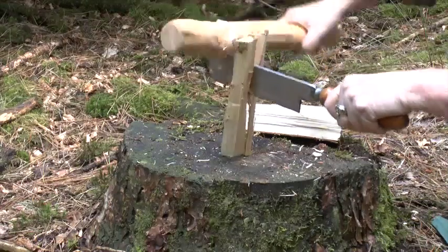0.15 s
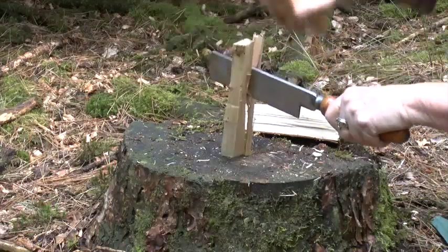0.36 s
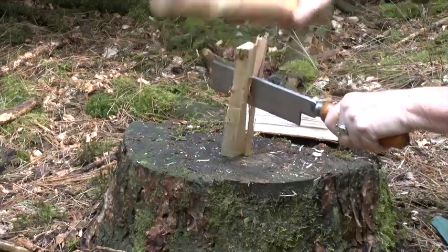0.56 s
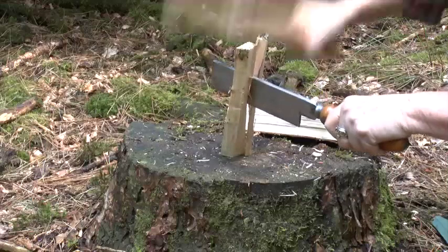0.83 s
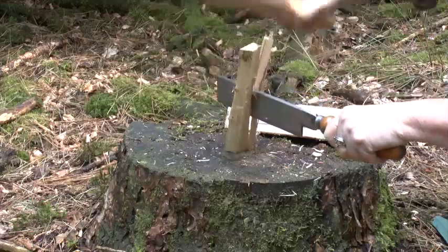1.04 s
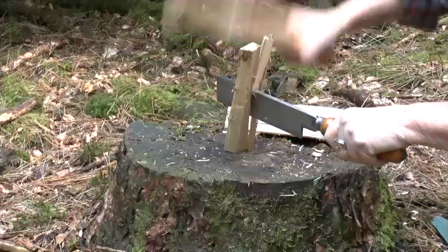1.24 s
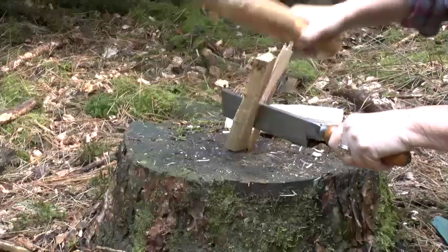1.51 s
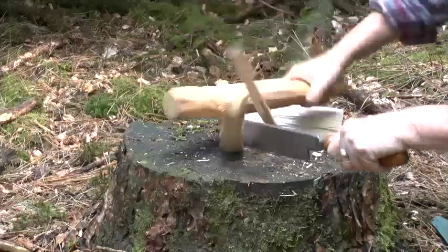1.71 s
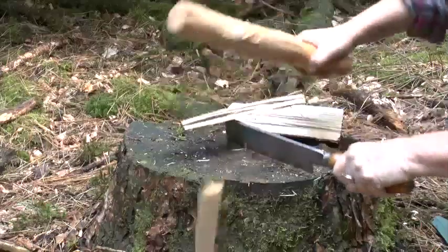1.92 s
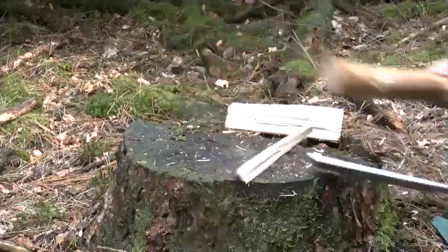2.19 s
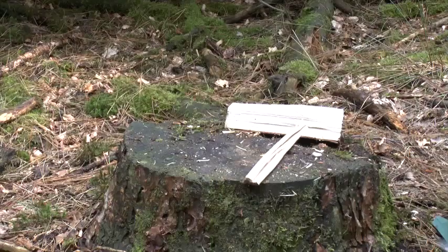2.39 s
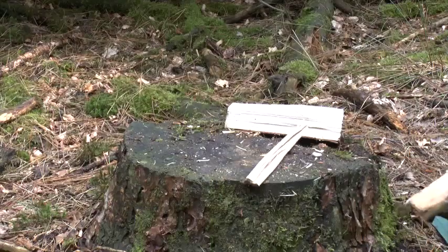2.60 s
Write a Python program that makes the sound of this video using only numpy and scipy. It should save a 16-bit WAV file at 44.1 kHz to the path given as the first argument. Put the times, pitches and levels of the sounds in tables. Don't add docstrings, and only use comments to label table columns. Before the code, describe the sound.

Wooden mallet striking a steel blade through a stick on a stump, five sharp knocks outdoors

```python
import sys
import numpy as np
from scipy import signal
from scipy.fft import rfft, irfft
from scipy.io import wavfile
from scipy.ndimage import uniform_filter1d

SR = 44100
rng = np.random.default_rng(int(sys.argv[2]) if len(sys.argv) > 2 else 0)


def gain_from_db(level_db):
    decades = np.asarray(level_db, float) / 20
    return 10 ** decades


def wav_record(signal):
    frames = np.transpose(np.atleast_2d(signal))
    bounded = np.clip(frames, -1, 1)
    quanta = np.round(bounded * 32767).astype(np.int16)
    wavfile.write(sys.argv[1], SR, quanta)


N = 121275

# (time [s], crack level [dB], stick boom level [dB], stump thud level [dB], contact [s])
BLOWS = [
    (0.206, -1, -6.5, -35, 0.003),
    (0.4956, 2, -7.5, -25.5, 0.0036),
    (0.9418, 1, -17.5, -18, 0.0013),
    (1.3468, -0.5, -15, -16.5, 0.0019),
    (1.7514, -0.5, -14.5, -17, 0.0034),
]
# (mallet level [dB], blade level [dB], blade pitch [ratio], tear level [dB], tear t60 [s])
SPLITS = [(0, -18, 1.0, -29.5, 0.13), (-3.5, -31, 1.2, -31.5, 0.25), (-3.5, -9, 1.017, -25.5, 0.25),
          (-2.5, -15, .98, -30.5, 0.13), (-2, -8.5, 1.01, -23, 0.15)]
# (edge tick level [dB], single ringing mode [Hz], its level [dB], lingering ring level [dB])
STEEL = [(-10, 3800, -5, -72), (-7.5, 3845, -5.5, -70), (-9, 2910, -15, -29), (-1.5, 3730, -11, -70),
         (-3, 4940, -4.5, -44)]
# (second mallet mode [Hz], its level [dB], stick pitch [ratio], fibre hiss level [dB],
# hiss t60 [s])
GRIP = [(1303, -7.5, 0.96, -47, 0.26), (1312, -1.5, 1.023, -44, 0.22), (1270, 2, 1.016, -41, 0.19),
        (1488, 5.5, 1.12, -34.5, 0.37), (1353, -3.5, 1.03, -34, 0.23)]
# (first [Hz], level [dB], second [Hz], level [dB])
EXTRA_MODES = [(250, -15, 6850, -11.5), (2675, -10, 6090, -16.5), (4000, -12.5, 4720, -12),
               (4300, -18, 562, -21), (2900, -14, 4650, -13)]
# (frequency [Hz], level [dB], t60 [s])
MALLET_MODES = [(1406, -3, 0.039), (1100, -5, 0.016), (795, -7.5, 0.017)]
# (frequency [Hz], level [dB], t60 [s])
BLADE_MODES = [(3800, -4, 0.019), (3230, -15.5, 0.0071), (5000, -3, 0.022), (5840, -37, 0.005),
               (6520, 7, 0.0075), (7740, 2.5, 0.011), (11140, -4.5, 0.02)]
# (frequency [Hz], level [dB], t60 [s])
STICK_MODES = [(376, 5, 0.022), (244, -8, 0.052), (587, -10, 0.036)]
# (frequency [Hz], level [dB])
CRACK_SPECTRUM = [(300, -19.5), (1900, 11), (3300, 12.5), (4700, 10), (6000, 6.5), (9000, -2),
                  (12000, -4.5), (15500, -5.5)]
# (frequency [Hz], level [dB])
TEAR_SPECTRUM = [(600, -47), (1500, -1.5), (3500, 3), (6500, 1), (9000, -9), (15500, -18)]
# (time [s], ring level [dB], ring [Hz], snap level [dB])
TICKS = [(0.4922, -21, 2400, -19), (0.9027, -26, 3800, -28.5), (1.109, -39, 2310, -33),
         (1.157, -35.5, 3840, -36.5), (1.322, -23.5, 3780, -43), (1.325, -29, 4030, -29),
         (1.46, -33, 2270, -28.5), (1.9073, -47, 3140, -44), (1.913, -33.5, 6300, -32),
         (1.9727, -18.5, 666, -23.5), (1.974, -20.5, 310, -56), (1.9785, -31, 5150, -21.5),
         (2.0413, -39, 2050, -33)]
# (time [s], ring level [dB], ring [Hz], snap
# level [dB], t60 [s])
MORE_TICKS = [(1.7800, -20.5, 657, -36, 0.017), (2.2800, -26.5, 2610, -15.5, 0.024),
                (2.2880, -28, 2690, -16, 0.031), (2.299, -40, 2750, -28, .02), (2.4211, -31, 250, -44, 0.018),
                (2.4416, -30, 2250, -19, 0.0049), (2.4713, -5.5, 1980, -9.5, 0.0048),
                (2.4887, -35, 2000, -18.5, 0.011), (2.4934, -25.5, 3590, -14.5, 0.017),
                (2.5118, -29, 4560, -26, 0.02), (2.5319, -26, 1330, -34, 0.0078),
                (2.575, -15.5, 2200, -42, 0.0041), (2.652, -37, 2230, -26, 0.019),
                (2.6795, -18, 2230, -22, 0.013), (2.686, -28.5, 742, -42, 0.026),
                (1.8805, -42, 2900, -32.5, .015), (1.897, -39, 2100, -36, 0.092), (1.9075, -36, 3300, -27, 0.0089),
              (2.003, -39, 6400, -33.5, 0.027), (2.2023, -40, 5300, -38, 0.0052), (2.4168, -32, 3200, -28, .005),
              (2.424, -30, 6130, -29.5, 0.0091), (2.432, -27, 2300, -26, .008), (2.4355, -38, 5000, -26, .005),
              (2.4480, -31, 2250, -28, .012), (2.449, -23, 2270, -27, 0.015), (2.4548, -25, 2300, -34, 0.0086),
              (2.4822, -36, 2400, -29, .006), (2.5075, -35, 1900, -24, 0.011), (2.6605, -36, 3730, -26, .01),
              (2.6650, -32, 3800, -33, 0.009), (2.6800, -16.5, 4300, -26, 0.0072), (2.6855, -30, 4100, -29, .007),
              (2.6951, -25.5, 2000, -40, 0.0093)]
# (frequency [Hz], level [dB])
SNAP_SPECTRUM = [(500, -21), (2000, 16), (5000, 11), (7000, 10), (10000, -2.5), (15500, -1)]
# (time [s], level [dB], frequency [Hz], t60 [s])
BUMPS = [(2.4279, -20.5, 226, 0.02), (2.4438, -18.5, 300, 0.015), (2.4517, -18, 280, 0.009),
         (2.4681, -21, 336, 0.021), (2.4714, -19.5, 457, 0.015), (2.4922, -21, 318, 0.022),
         (2.506, -31, 300, 0.013), (2.516, -35, 258, 0.016), (2.643, -38, 260, 0.012),
         (2.6778, -19.5, 326, 0.015), (2.6815, -27.5, 790, 0.022)]
# (time [s], level [dB])
SPLINTERS = [(1.4598, -28), (1.9412, -39), (1.894, -42), (2.2025, -35), (2.281, -30)]
# (start [s], length [s], level [dB], low wood level [dB], favoured [Hz])
SCRAPES = [(1.874, 0.043, -52, -55, 4000), (1.893, 0.041, -51, -47, 2170),
           (1.985, 0.051, -49.5, -46.5, 6300), (2.039, 0.019, -47.5, -54, 7130),
           (2.185, 0.054, -41.5, -47.5, 5260), (2.217, .06, -47.5, -47.5, 4950),
           (2.279, 0.066, -45.5, -50, 6100), (2.354, 0.097, -50.5, -46, 5050),
           (2.406, 0.23, -44.5, -36.5, 2380), (2.647, 0.1, -45.5, -37.5, 2950),
           (2.705, 0.056, -58, -42.5, 3030)]
# (frequency [Hz], level [dB])
RUSTLE_SPECTRUM = [(1500, -15), (4000, 7), (8000, 2), (12000, -6), (15500, -5)]
# (frequency [Hz], lead [rad])
LEFT_LEAD = [(60, 0.58), (860, 0.36), (2840, 0.16), (6500, 0.0072), (9000, 0.21)]
# (frequency [Hz], t60 [s])
ECHO_DECAY = [(200, .08), (1000, .2), (4000, .6), (7500, .55), (10000, .12)]
# (time [s], drone level [dB])
ENGINE_SWELL = [(0, -44), (.4, -45.5), (.8, -40), (1.052, -45.5), (1.25, -43.5), (1.5, -49), (1.7, -42.5),
                (1.95, -49), (2.2, -40.5), (2.5, -37.5), (2.75, -41)]
# (frequency [Hz], width [Hz], level [dB])
DRONES = [(72.8, 15.3, -7), (130, 21.5, -5.5)]
# (frequency [Hz], level [dB])
DRONE_NOISE = [(40, -30), (65, 0), (200, -6), (400, -31)]
# (frequency [Hz], level [dB])
ROAR_SPECTRUM = [(100, -13), (300, 1.5), (820, 0.5), (950, -10.5)]
# (frequency [Hz], density [dB per Hz])
WOOD_SPECTRUM = [(30, -44), (60, -4), (130, 2), (700, -16), (1400, -5), (4500, -13.5), (8000, -25),
                 (15500, -38.5), (16300, -62)]
# (frequency [Hz], correlation [0-1])
LIKENESS = [(100, 0.95), (550, 0.41), (2000, 0.76), (4500, 1), (7000, 1), (9000, 0.73)]

THUD_HZ, THUD_T60_S = 83, 0.032
PAIR_T60_S, EXTRA_T60_S, TOP_T60_S, RING_SWELL_S = 0.017, 0.018, 0.017, 0.0027
EDGE_HZ, EDGE_WIDTH_HZ = 14000, 4500
LINGER_HZ, LINGER_WIDTH_HZ, LINGER_T60_S = 4950, 140, 0.45
TEAR_PER_S, TEAR_SPREAD_DB, HISS_HZ, HISS_WIDTH_HZ = 4900, 1.5, 6850, 1940
EARLIER_DB, EARLIER_T60_S = -49.5, 0.54
SCRAPE_PER_S, SCRAPE_SPREAD_DB = 9000, 2.5
SPLINTER_HZ, SPLINTER_WIDTH_HZ, SPLINTER_T60_S = 13100, 3700, 0.011
RUSTLE_DB, RUSTLE_FROM_S, RUSTLE_TO_S = -55.5, 1.75, 2.42
LATE_PAN_DB, LATE_FROM_S = -4.5, 2.4
ECHO_DB, ECHO_WIDTH = -27, 0.028
FIRING_HZ, FIRING_DB, WOBBLE_HZ, STEADY_FROM_S = 85.6, -1, 1.98, 0.96
ROAR_DB, ROAR_FOLLOW = -4.5, 0.97
WOOD_DB = -48.5
TOP_HZ, LOW_CUT_HZ, CEILING, KNEE = 15800, 31, 1.08, 6.0


def evened(x):
    return x / np.sqrt(np.mean(x ** 2) + 1e-20)


def peaked(x):
    return x / abs(x).max()


def read(points, hz):
    f, value = np.transpose(points)
    return np.interp(np.log(hz + 1), np.log(f + 1), value)


def add(mix, s, sound):
    part = mix[round(s * SR):][:len(sound)]
    part += sound[:len(part)]


def high(x, hz):
    return signal.lfilter(*signal.butter(2, hz, "high", fs=SR), x)


def colour(x, points):
    log_gain = np.log(gain_from_db(read(points, abs(np.fft.fftfreq(2048, 1 / SR)))))
    phase = -signal.hilbert(log_gain).imag
    taps = np.fft.ifft(np.exp(log_gain + 1j * phase)).real[:1024]
    return signal.oaconvolve(x, taps / np.linalg.norm(taps))[:len(x)]


def resonate(x, hz, width_hz):
    turn = np.exp(2j * np.pi * hz * np.arange(x.shape[-1]) / SR)
    r = np.exp(-np.pi * width_hz / SR)
    return 2 * (turn * signal.lfilter([1 - r], [1, -r], x / turn)).real


def modes(table, ratio=1):
    t = np.arange(SR // 2) / SR
    return sum(gain_from_db(db - 60 * t / t60) * np.sin(2 * np.pi * hz * ratio * t) for hz, db, t60 in table)


def struck(force, table, ratio=1):
    return signal.fftconvolve(force, modes(table, ratio))[:len(force)]


def grains(count, per_s, spread_db):
    chance, side, size = rng.random((count, 3)).T
    sizes = gain_from_db(-spread_db * np.log(np.maximum(size, 0.01)))
    return evened((chance < per_s / SR) * np.sign(side - 0.5) * sizes)


def blow(hit, split, steel, grip, extra):
    crack_db, boom_db, thud_db, contact_s = hit
    ring_db, blade_db, blade_ratio, tear_db, tear_t60 = split
    edge_db, top_hz, top_db, linger_db = steel
    pair_hz, pair_db, stick_ratio, hiss_db, hiss_t60 = grip
    a_hz, a_db, b_hz, b_db = extra
    t = np.arange(SR // 2) / SR
    swell = np.minimum(t / 0.00053, 1)

    release = np.where(t < contact_s, 1, gain_from_db(-60 * (t - contact_s) / 0.017))
    chatter = grains(len(t), 9000, 4.13) * np.minimum(t / 0.00025, 1) * release
    push = np.sin(np.pi * np.clip(t / 0.000668 - 0.5, 0, 1)) ** 2 + 0.26 * chatter

    mallet = struck(push, MALLET_MODES + [(pair_hz, pair_db, PAIR_T60_S)])
    mallet = mallet * np.minimum(t / RING_SWELL_S + 0.31, 1)
    stick = high(high(struck(push, STICK_MODES, stick_ratio), 220), 74)
    edge = resonate(rng.standard_normal(len(t)) * gain_from_db(-60 * t / 0.0021), EDGE_HZ, EDGE_WIDTH_HZ)
    linger = resonate(rng.standard_normal(len(t)), LINGER_HZ, LINGER_WIDTH_HZ)
    parts = [
        (crack_db, colour(chatter, CRACK_SPECTRUM)),
        (ring_db, mallet),
        (blade_db, struck(chatter, BLADE_MODES, blade_ratio)),
        (boom_db, stick),
        (edge_db, edge),
        (linger_db, linger * gain_from_db(-60 * t / LINGER_T60_S)),
        (top_db, swell * modes([(top_hz, 0, TOP_T60_S)])),
        (a_db, swell * modes([(a_hz, 0, EXTRA_T60_S)])),
        (b_db, swell * modes([(b_hz, 0, EXTRA_T60_S)])),
        (thud_db, -swell * modes([(THUD_HZ, 0, THUD_T60_S)])),
    ]
    fibres = tearing(t, tear_db, tear_t60, hiss_db, hiss_t60)
    return swell * fibres + sum(gain_from_db(db) * peaked(x) for db, x in parts)


def tearing(t, tear_db, tear_t60, hiss_db, hiss_t60):
    snaps = grains(len(t), TEAR_PER_S, TEAR_SPREAD_DB)
    hiss = resonate(resonate(snaps, HISS_HZ, HISS_WIDTH_HZ), HISS_HZ, 2 * HISS_WIDTH_HZ)
    crackle = colour(snaps, TEAR_SPECTRUM) * gain_from_db(tear_db - 60 * t / tear_t60)
    return crackle + evened(hiss) * gain_from_db(hiss_db - 60 * t / hiss_t60)


def earlier_fibres():
    t = np.arange(N) / SR
    return gain_from_db(EARLIER_DB - 60 * t / EARLIER_T60_S) * colour(rng.standard_normal(N), TEAR_SPECTRUM)


def tick(ring_db, hz, snap_db, t60=0.02):
    t = np.arange(SR // 10) / SR
    noise = rng.standard_normal(len(t))
    ring = np.sin(2 * np.pi * hz * t) * np.minimum(2000 * t, 1) * gain_from_db(ring_db - 60 * t / t60)
    rough = 1 + 0.25 * evened(uniform_filter1d(noise[::-1], 30))
    snap = colour(noise * gain_from_db(-60 * t / (0.85 * t60)), SNAP_SPECTRUM)
    return ring * rough + gain_from_db(snap_db) * peaked(snap)


def bump(db, hz, t60):
    onset = np.minimum(np.arange(SR // 2) / SR / 0.0005, 1)
    return -onset * modes([(hz, db, t60)])


def splinter(db):
    t = np.arange(400) / SR
    burst = evened(resonate(rng.standard_normal(400), SPLINTER_HZ, SPLINTER_WIDTH_HZ))
    return gain_from_db(db - 60 * t / SPLINTER_T60_S) * burst


def scrape(length_s, level_db, low_db, hz, grit):
    count = SR // 4
    slips = grains(count, SCRAPE_PER_S, SCRAPE_SPREAD_DB)
    clumps = gain_from_db(2 * evened(uniform_filter1d(rng.standard_normal(count), size=150)))
    progress = np.minimum(np.arange(count) / SR / length_s, 1)
    stroke = np.sin(np.pi * progress ** 0.56) ** 2
    bright = colour(slips, grit) + 0.75 * evened(resonate(slips, hz, 330))
    low = evened(high(struck_short(slips), 180))
    return stroke * clumps * (gain_from_db(level_db) * bright + gain_from_db(low_db) * low)


def struck_short(slips):
    return struck(slips, STICK_MODES, 0.79)


def rustle():
    t = np.arange(N) / SR
    gate = np.clip(np.minimum(t - RUSTLE_FROM_S, RUSTLE_TO_S - t) * 20, 0, 1)
    return gain_from_db(RUSTLE_DB) * gate * colour(grains(N, SCRAPE_PER_S, 4.5), RUSTLE_SPECTRUM)


def placed(near):
    lead = np.exp(0.5j * read(LEFT_LEAD, np.fft.rfftfreq(N, 1 / SR)))
    pair = irfft(rfft(near) * np.array([lead, 1 / lead]), N)
    late = np.clip((np.arange(N) / SR - LATE_FROM_S) / 0.026, 0, 1)
    pan_db = 0.5 + LATE_PAN_DB * late
    return pair * gain_from_db(np.array([pan_db, -pan_db]) / 2)


def echo(x):
    taps = np.zeros((2, SR // 2))
    starts = np.arange(200, SR // 2 - 20, 20)
    shape = (2, len(starts))
    np.put_along_axis(taps, starts + rng.integers(0, 20, shape), rng.choice([-1., 1.], shape), 1)
    hz, t, z = signal.stft(taps, SR, nperseg=256)
    decay = gain_from_db(-60 * t / read(ECHO_DECAY, hz)[:, None])
    mid, side = signal.istft(z * decay, SR, nperseg=256)[1]
    tail = np.array([mid + ECHO_WIDTH * side, mid - ECHO_WIDTH * side])
    return signal.fftconvolve(x[None], tail / np.linalg.norm(tail[0]), axes=1)[:, :N]


def engine():
    t, (s, db) = np.arange(N) / SR, np.transpose(ENGINE_SWELL)
    level_db = np.interp(t, s, db)
    noise = field(DRONE_NOISE, patchy_db=1.5)
    drone = sum(gain_from_db(d) * evened(resonate(resonate(noise, hz, w), hz, 3 * w)) for hz, w, d in DRONES)
    wobble = evened(uniform_filter1d(uniform_filter1d(rng.standard_normal(N), 4000), 4000))
    tone = np.sqrt(2) * np.sin(2 * np.pi * np.cumsum(FIRING_HZ + WOBBLE_HZ * wobble) / SR)
    steady = np.clip((t - STEADY_FROM_S) / 0.37, 0.25, 1)
    hum = gain_from_db(FIRING_DB) * steady * tone + (1.2 - 0.28 * steady) * drone
    roar = field([(40, -50)] + ROAR_SPECTRUM + [(4000, -30.5)], patchy_db=2)
    roar_db = ROAR_DB + db.mean() + ROAR_FOLLOW * (level_db - db.mean())
    return gain_from_db(level_db) * hum + gain_from_db(roar_db) * roar


def woodland():
    return gain_from_db(WOOD_DB) * field(WOOD_SPECTRUM, patchy_db=1.0)


def field(points, patchy_db):
    frames, hz = N // 256 + 5, np.fft.rfftfreq(1024, 1 / SR)
    a, b, c, d, patches = rng.standard_normal((frames, 513, 5)).T
    patches = evened(uniform_filter1d(uniform_filter1d(patches, 12, 0), 14, 1))
    same = np.clip(read(LIKENESS, hz), -1, 1)[:, None]
    left = a + 1j * b
    right = same * left + np.sqrt(1 - same ** 2) * (c + 1j * d)
    gain = gain_from_db(read(points, hz)[:, None] + patchy_db * patches)
    return evened(signal.istft(np.array([left, right]) * gain, nperseg=1024, noverlap=768)[1][:, :N])


def scene():
    near = earlier_fibres() + rustle()
    for (s, *hit), split, steel, grip, extra in zip(BLOWS, SPLITS, STEEL, GRIP, EXTRA_MODES):
        add(near, s, blow(hit, split, steel, grip, extra))
    for s, *contact in TICKS + MORE_TICKS:
        add(near, s, tick(*contact))
    for s, *contact in BUMPS:
        add(near, s, bump(*contact))
    for s, db in SPLINTERS:
        add(near, s, splinter(db))
    for s, *stroke in SCRAPES:
        grit = SNAP_SPECTRUM if s < LATE_FROM_S - 0.1 else TEAR_SPECTRUM
        add(near, s, scrape(*stroke, grit))
    return placed(near) + gain_from_db(ECHO_DB) * echo(near) + engine() + woodland()


def low_pass(x):
    return signal.sosfilt(signal.butter(12, 16570, fs=SR, output="sos"), x)


def record(dry):
    dry = signal.oaconvolve(dry, signal.firwin(201, TOP_HZ, fs=SR)[None], "same")
    dry = high(dry, LOW_CUT_HZ)
    mix = CEILING * dry / (1 + abs(dry / CEILING) ** KNEE) ** (1 / KNEE)
    return low_pass(mix)


dry = scene()
out = record(dry)
wav_record(out)
```